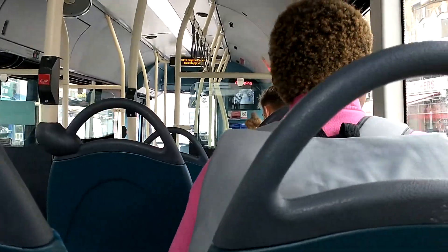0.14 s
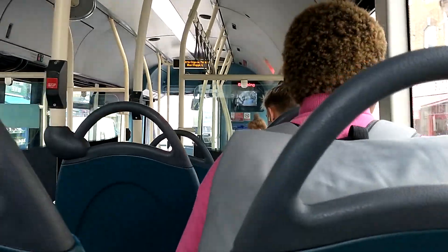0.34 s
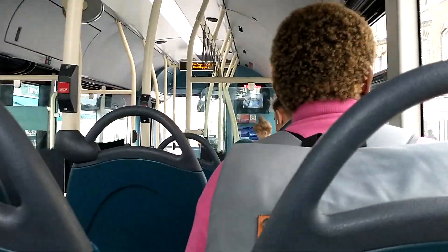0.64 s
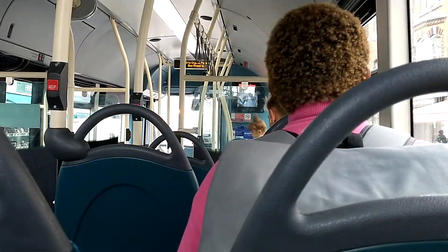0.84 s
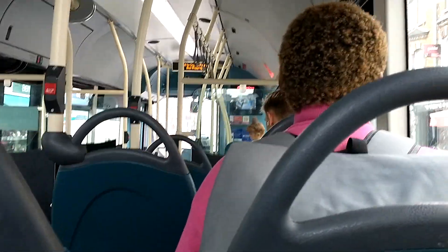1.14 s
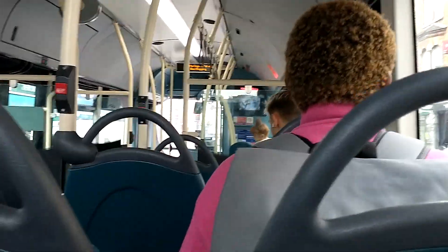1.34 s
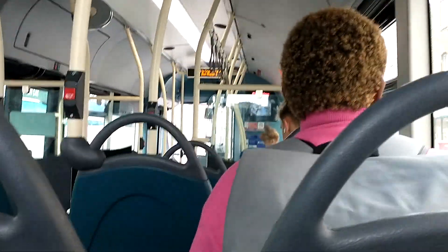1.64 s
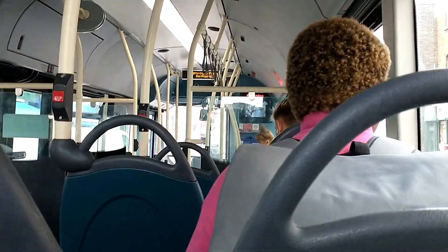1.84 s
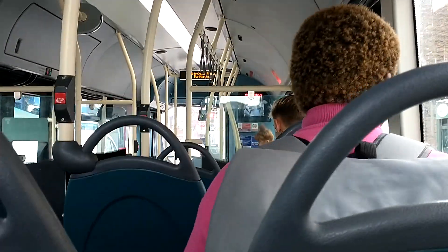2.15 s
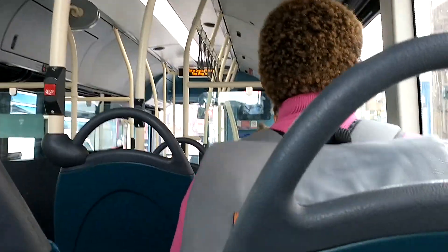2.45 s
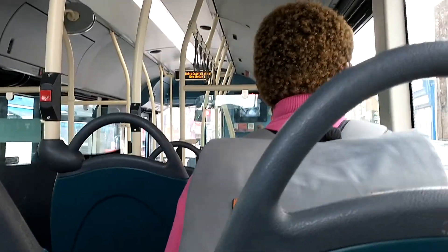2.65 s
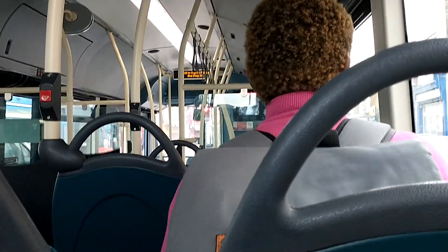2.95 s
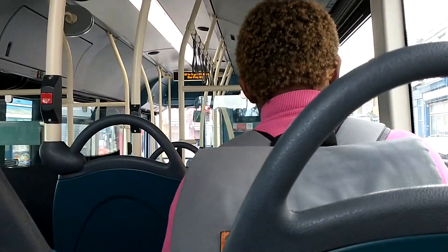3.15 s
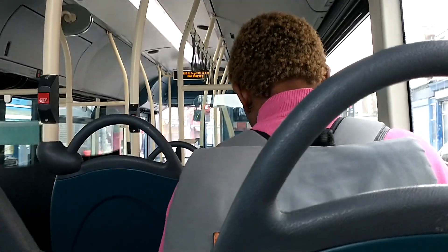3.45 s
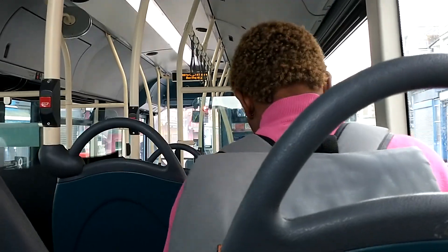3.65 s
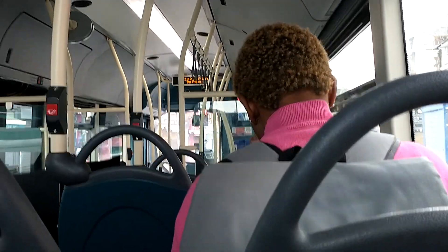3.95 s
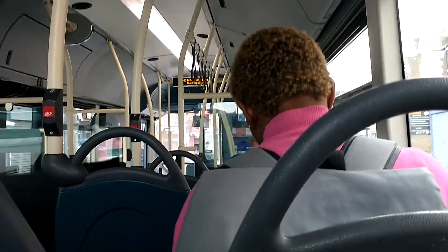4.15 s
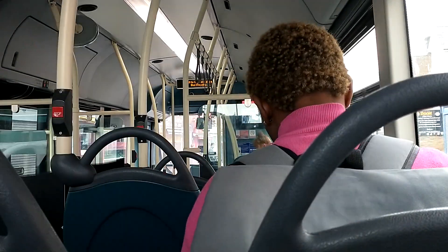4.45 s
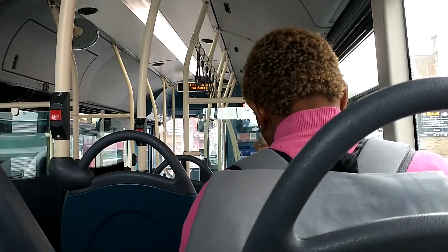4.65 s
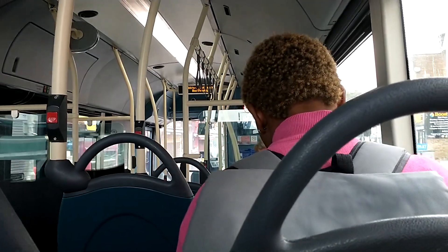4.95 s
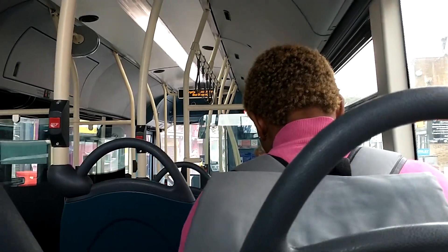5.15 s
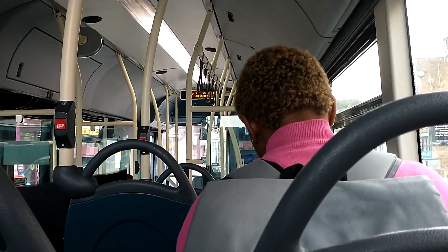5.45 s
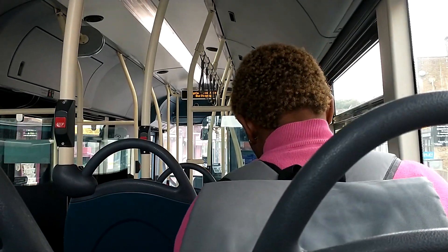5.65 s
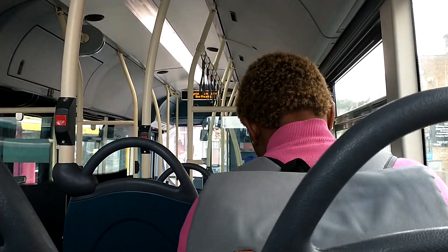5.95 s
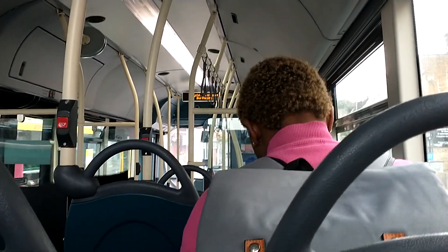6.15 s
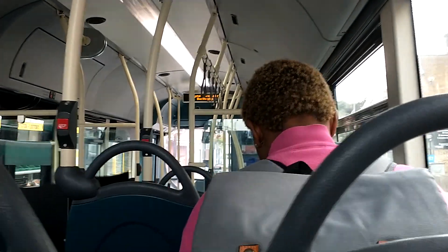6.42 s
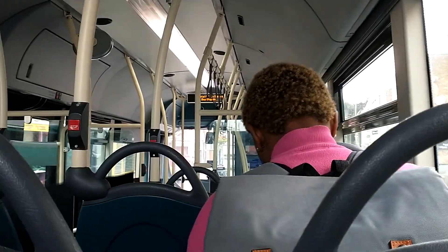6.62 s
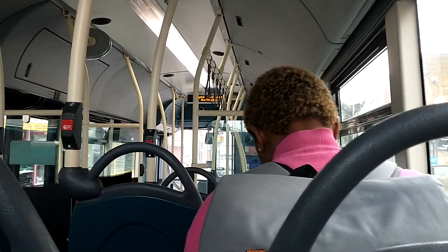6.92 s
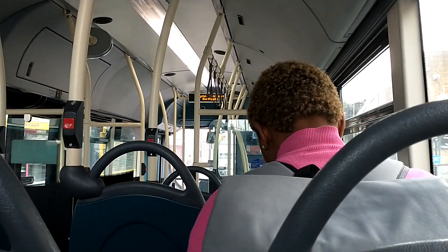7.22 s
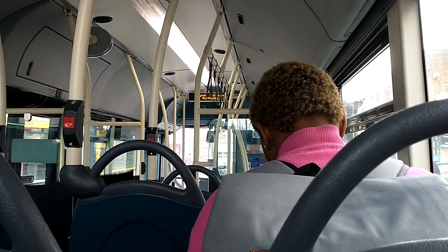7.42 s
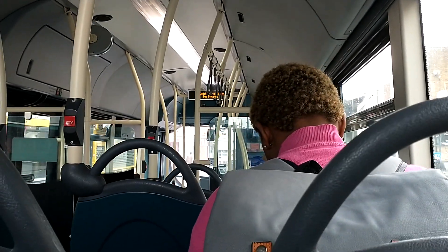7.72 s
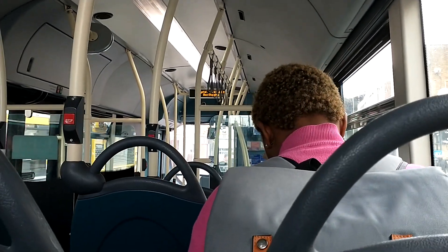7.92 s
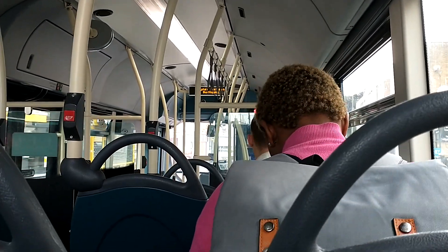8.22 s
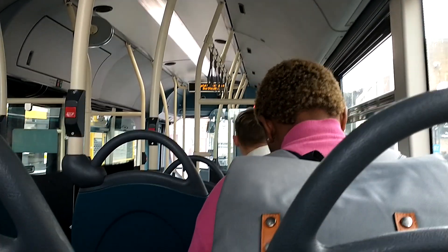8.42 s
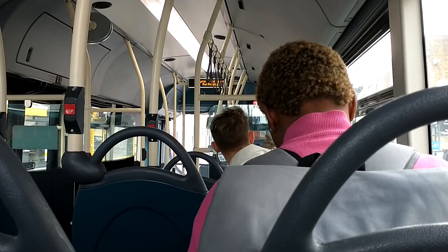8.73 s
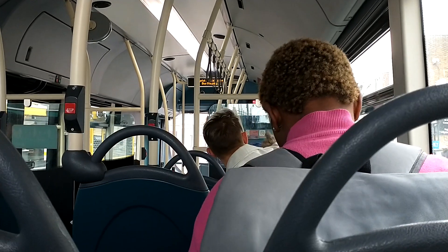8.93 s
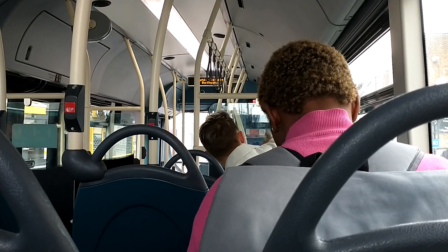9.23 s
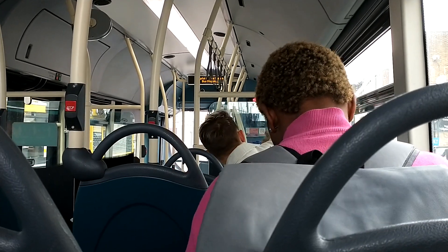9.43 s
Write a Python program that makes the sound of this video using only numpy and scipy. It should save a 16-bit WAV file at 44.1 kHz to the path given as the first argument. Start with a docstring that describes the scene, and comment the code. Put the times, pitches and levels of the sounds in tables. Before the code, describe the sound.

From a seat towards the rear of a bus, the engine growls, drops in pitch and settles into slow pulsing. Wheel bumps thud gently, panels boom and trim buzzes; a dense cluster of rattles and jolts comes midway. A thin high brake squeal and a tiny air spit follow, then steady idling, one brief rough hiss of brake air and a few last rattles. Treble leans left.

```python
"""Inside a diesel bus that slows down and stops: the engine, a sum of firing orders, falls to idle and throbs.
A low rumble of filtered noise swells over bumps, then holds on under the idle. As the engine pulls against
the brakes the body shudders in resonant bands, trim buzzes and taps at each firing, and struck fittings ring.
The brakes then squeal faintly as two wavering modes, and the valve spits. Once the bus stands, a short hiss
of turbulent noise lets the brake air out while the engine idles on."""
import sys
import numpy as np
from scipy import signal
from scipy.fft import rfft, irfft
from scipy.io import wavfile
from scipy.ndimage import uniform_filter1d

SR = 44100
rng = np.random.default_rng(int(sys.argv[2]) if len(sys.argv) > 2 else 0)


def bounce(signal):
    """Save signal as a 16-bit WAV file at the path given by the first command-line argument."""
    frames = np.transpose(np.atleast_2d(signal))
    limited = np.clip(frames, -1, 1)
    pcm = np.round(limited * 32767).astype(np.int16)
    wavfile.write(sys.argv[1], SR, pcm)


N = 422478
TIME = np.arange(N) / SR
BINS = np.fft.rfftfreq(N, 1 / SR)
# Every table named COLOUR is a relative noise spectrum: [f/Hz, spectral level/dB].


def amp(db):
    """Logarithmic level: converts decibels to amplitude gain."""
    return 10 ** (np.asarray(db) / 20)


def unit(x):
    """Power normalisation: scales a signal to rms 1."""
    return x / np.sqrt(np.mean(x ** 2) + 1e-20)


def curve(rows, column=1):
    """Linear interpolation: one column of a time table at every sample."""
    rows = np.asarray(rows)
    return np.interp(TIME, rows[:, 0], rows[:, column])


def read(points, hz):
    """Logarithmic frequency scale: interpolates a spectrum table along it."""
    f, value = np.transpose(points)
    return np.interp(np.log(hz + 1), np.log(f + 1), value)


def add(mix, s, sound):
    """Superposition: mixes a stereo sound in at time s."""
    part = mix[:, max(round(s * SR), 0):][:, :sound.shape[1]]
    part += sound[:, :part.shape[1]]


def drift(rate_hz):
    """Low-pass random process: slow motion of rms 1."""
    size = N // 32
    hz = np.fft.rfftfreq(size, 32 / SR)
    low_pass = np.exp(-(hz / rate_hz) ** 2) * (hz > 0)
    slow = unit(irfft(rfft(rng.standard_normal(size)) * low_pass, size))
    return np.interp(TIME, np.linspace(0, TIME[-1], size), slow)


def ringing(modes, size):
    """Modal resonance: the lift in dB that bell-shaped peaks give to each frequency."""
    hz = np.fft.rfftfreq(size, 1 / SR)
    return sum(db / (1 + (2 * (hz - f) / width) ** 2) for f, width, db in modes)


# Likeness of the two microphones: [f/Hz, correlation/1]
LIKENESS = [(90, .999), (125, .99), (250, .93), (500, .68), (900, .35), (1500, .22), (2500, 0)]


def in_cabin(drive, colour, extra_db=0):
    """Spatial coherence: colours two unrelated signals; long waves reach both microphones alike."""
    size = drive.shape[1]
    hz = np.fft.rfftfreq(size, 1 / SR)
    a, b = rfft(drive) * amp(read(colour, hz) + extra_db)
    same = np.clip(read(LIKENESS, hz), -1, 1)
    mid = a * np.sqrt(1 + same)
    side = b * np.sqrt(1 - same)
    return unit(irfft(np.array([mid + side, mid - side]), size))


def noise(colour, envelope=1, extra_db=0):
    """Filtered random excitation: coloured stereo noise under an envelope."""
    return in_cabin(rng.standard_normal((2, N)) * envelope, colour, extra_db)


def echoes(x, t60):
    """Reverberation: one source reaches each microphone by its own dense set of reflections."""
    t = np.arange(SR // 2) / SR
    tails = rng.standard_normal((2, len(t))) * amp(-60 * t / t60)
    return signal.fftconvolve(x[None], tails, axes=1)[:, :len(x)]


def swell(start, length, rise_db_per_s, fall_db_per_s):
    """Exponential growth and decay: an envelope that rises to 1 at the start, holds, then dies away."""
    before = np.maximum(start - TIME, 0)
    after = np.maximum(TIME - start - length, 0)
    return amp(-rise_db_per_s * before - fall_db_per_s * after)


def swells(rows, rise_db_per_s, fall_db_per_s, column=2):
    """Dominance of the strongest: the joint envelope of a table of events."""
    parts = [amp(row[column]) * swell(row[0], row[1], rise_db_per_s, fall_db_per_s) for row in rows]
    return np.max(parts, axis=0)


def gush(start, end, open_s, shut_s):
    """Valve flow: builds up ever more slowly and is then pinched off ever faster."""
    opening = np.exp(np.minimum((start - TIME) / open_s, 10))
    closing = (np.maximum(TIME - end, 0) / shut_s) ** 2
    return np.exp(-opening - closing)


def firing(turns, decay, base, uneven_db, lag):
    """Periodic excitation: a burst of uneven strength per cycle, dying within a share of it."""
    cycle = turns + lag % 1
    burst_db = uneven_db * np.clip(rng.standard_normal(1024), -2, 1.2)
    strength = amp(burst_db)[cycle.astype(int)]
    return base + strength * np.exp(-(cycle % 1) / decay)


# Effort of the engine: [t/s, level above idle/dB]
LOAD = [(0, 7), (.55, 7), (.8, 5), (1, 4), (1.7, 4.5), (2.2, 0), (3.5, -5), (4.2, 0.5), (6.2, -1.5),
        (6.7, .5), (8.2, 1), (9.58, 1)]


def effort(idle_db, follow):
    """Load dependence: the level of a layer that follows a share of the engine's load."""
    return amp(idle_db + follow * curve(LOAD))


ROLL_COLOUR = [(10, -16), (22, -7.5), (32, 5.5), (48, -17), (66, 12), (90, 9.5), (120, -3), (250, -60.5),
               (2000, -100)]
BOOM_COLOUR = [(35, -25.5), (65, -9), (95, -4.5), (120, 1.5), (145, -4), (175, -7), (210, -10.5),
               (260, -16.5), (500, -71.5), (3000, -100)]  # also weights the upper orders of the drone
ROAR_COLOUR = [(130, -14), (230, -1), (290, -0.5), (390, -2.5), (480, -4.5), (560, -4), (630, -6.5),
               (760, -11), (880, -14.5), (1300, -22), (3000, -54), (9000, -100)]
# Resonances of floor and panels: [f/Hz, width/Hz, lift/dB]
PANELS = [(131, 8.6, 2.5), (155, 8.6, 10), (176.5, 22, -2.5), (195.6, 22, 3), (242, 17, -3), (348, 16, 5),
          (443.4, 11, 7), (504, 15, 3), (544, 11, 1.5), (594, 24, -4), (640, 9.1, -2), (662, 49, 2),
          (732, 24, 5), (818, 21, 4), (1033, 42, 6), (1230, 30, 5)]
# Low rumble, of the running gear while the bus rolls, then held on under the idle: [t/s, level/dB]
ROAD = [(0, -38), (.75, -37), (1.2, -27.5), (2.5, -34.5), (4.1, -33), (4.7, -38.5)]
# Bumps under the wheels: [start t/s, length/s, level/dB]
BUMPS = [(.92, 0.038, -32.5), (1.6, 0.12, -26.5), (2.2, 0.019, -23.5), (2.74, 0.12, -28),
         (3.18, 0.063, -34), (3.76, 0.076, -26.5), (4.03, 0.44, -33), (4.57, 0.066, -24.5)]


def body(turns, shake, roll_db=0, boom_db=-38.5, boom_follow=0.82, shaken_boom_db=-2,
         roar_db=-41.5, roar_follow=0.21, shaken_roar_db=-9.0):
    """Forced vibration: a low rumble swells over bumps; firings and shudders make floor and panels boom and roar."""
    panels = ringing(PANELS, N)
    bumps = swells(BUMPS, rise_db_per_s=199.0, fall_db_per_s=85.5)
    # unrelated causes add in power
    roll = amp(roll_db) * np.hypot(amp(curve(ROAD)), bumps)
    boom = np.hypot(effort(boom_db, boom_follow), amp(shaken_boom_db) * shake)
    roar = np.hypot(effort(roar_db, roar_follow), amp(shaken_roar_db) * shake)
    boom_pulses = firing(turns, 0.94, 3.6, 6.1, 0.048)
    roar_pulses = firing(2 * turns, 0.65, 2.4, 1.3, .1)
    return (roll * noise(ROLL_COLOUR)
            + boom * noise(BOOM_COLOUR, boom_pulses, panels)
            + roar * noise(ROAR_COLOUR, roar_pulses, panels))


TRIM_COLOUR = [(3000, -36), (5500, -11.5), (7000, -3.5), (8300, -2), (9600, -8), (10500, -9), (13000, -19),
               (16000, -17)]
KNOCK_COLOUR = [(200, -29), (600, -16), (1500, 6.5), (2700, 3), (3400, -14.5), (4700, -14.5), (6500, -19.5),
                (10000, -39.5), (16000, -43.5)]  # also colours the single knocks
# Resonances of the metal trim, the loose fittings and smaller parts: [f/Hz, width/Hz, lift/dB]
TRIM_MODES = [(6500, 200, 5), (8200, 260, 1.5), (8750, 160, 2), (9400, 320, 5)]
FITTING = [(1540, 39, 3.5), (2500, 120, 6), (2717, 90, 4), (4170, 250, -5.5), (4490, 110, 6), (4650, 90, 3),
           (4880, 130, 7)]
SMALL_PARTS = [(5270, 130, 9), (5790, 130, 7), (6030, 150, -3.5), (6530, 190, 11.5), (6950, 130, 5),
               (7450, 120, 7), (8200, 250, 6)]
# Spells in which a loose metal trim buzzes: [start t/s, length/s, level/dB]
BUZZES = [(1.08, 0.42, -74.5), (1.8, .12, -75), (2.78, .16, -71.5), (3.28, .06, -78), (3.78, .05, -75),
          (4.22, 0.18, -70), (4.5, 0.57, -69), (5.1, 0.83, -69.5), (6.3, 0.79, -71.5), (7.0, 0.42, -72.5),
          (9.05, 0.32, -64)]
# Shudders of the body: [start t/s, length/s, shaking before each layer's gain/dB, rattle level/dB]
SHUDDERS = [(1.53, 0.037, -32, -72), (2.8, 0.089, -30, -53), (4.01, 0.072, -26, -68),
            (4.35, 0.043, -28, -64), (4.56, 0.16, -23, -55), (4.86, 0.15, -23.5, -44.5),
            (5.18, 0.17, -20.5, -45), (5.42, 0.16, -19.5, -43.5), (5.71, 0.064, -24.5, -46.5),
            (8.32, 0.24, -29, -51), (8.585, 0.026, -24, -40), (9.54, 0.046, -27.5, -51)]


def buzzes(turns, trim_db=0, trim_rest_db=-86, rattle_db=0, rattle_rest_db=-66, detune=0.011):
    """Repeated contact: firings shake trim and fittings; shudders rattle two detuned sets in shifting shares."""
    trim = echoes(rng.standard_normal(N) * firing(turns, 0.22, .2, 2, 0.5), 0.21)
    rattle = echoes(rng.standard_normal(N) * firing(turns, 0.39, 0.8, 2.6, 0.22), 0.23)
    trim_swells = swells(BUZZES, rise_db_per_s=103, fall_db_per_s=72.0)
    rattle_swells = swells(SHUDDERS, rise_db_per_s=162, fall_db_per_s=48, column=3)
    buzzing = np.hypot(amp(trim_rest_db), amp(trim_db) * trim_swells)
    rattling = np.hypot(amp(rattle_rest_db), amp(rattle_db) * rattle_swells)
    parts = np.array(FITTING + SMALL_PARTS)
    low = in_cabin(rattle, KNOCK_COLOUR, ringing(parts, N))
    high = in_cabin(rattle, KNOCK_COLOUR, ringing(parts * [1 + detune, 1, 1], N))
    share = np.clip(.35 + .6 * drift(8), 0, 1)
    fittings = (1 - share) * low + share * high
    return buzzing * in_cabin(trim, TRIM_COLOUR, ringing(TRIM_MODES, N)) + rattling * fittings


TAP_COLOUR = [(3000, -28), (6000, -7), (7800, -4.5), (9000, -1), (10200, -13), (11200, -14), (15000, -24)]
# Spells in which a strip of trim taps: [start t/s, length/s, level/dB, ring f/Hz, ring lift/dB]
TAPPING = [(4.12, .74, -72.5, 9600, 17), (4.85, .75, -71, 6420, 25), (6.149, 0.8, -75.5, 9470, 3),
           (6.898, .6, -82, 9470, 3), (8.9, 0.8, -72.5, 9400, 9)]


def taps(turns, level_db=0, ring_width_hz=320):
    """Periodic impact: a strip of trim taps once per firing, a crisp, even ticking."""
    out = np.zeros((2, N))
    beat = firing(turns, .1, .08, 1, .55)
    for start, length, db, ring_hz, ring_db in TAPPING:
        part = beat[round(start * SR):][:round(length * SR)]
        size = len(part)
        drive = rng.standard_normal((2, size)) * part * signal.windows.tukey(size, .5)
        ring = ringing([(ring_hz, ring_width_hz, ring_db)], size)
        add(out, start, amp(db + level_db) * in_cabin(drive, TAP_COLOUR, ring))
    return out


def blow(colour, rise, t60, grain_db, extra_db=0):
    """Damped impact: up to half a second of chattering contact that dies away in the cabin."""
    t = np.arange(SR // 2) / SR
    grain = unit(uniform_filter1d(rng.standard_normal(len(t)), size=130))
    drive = rng.standard_normal((2, len(t))) * amp(grain_db * grain) * amp(-60 * t / t60)
    attack = 1 - np.exp(-(t / rise) ** 2)
    fade_out = np.clip(2 - 5 * t, 0, 1)
    return in_cabin(drive, colour, extra_db) * attack * fade_out


TICK_COLOUR = [(1500, -26), (4000, 2), (7000, 8), (9500, 0), (11000, -10), (14500, -8), (16000, -19)]
JOLT_COLOUR = [(60, -6.5), (160, -14), (330, 0), (500, 5.5), (900, -9.5), (1600, -13.5), (3000, -20),
               (9000, -75.5)]
SPIT_COLOUR = [(300, -6), (750, 13), (1200, 4), (1900, 13), (2700, 4), (3700, 6), (5500, -5), (8500, -10),
               (11000, -20), (15500, -22)]
# Levels in these four tables are relative; the function adds a gain common to each kind.
# Knocks of the fittings: [t/s, level/dB, treble index/dB, pitch of the struck part f/Hz, ring lift/dB]
KNOCKS = [(1.3246, -36.5, -30, 1850, 4), (2.131, -34.5, -27, 2650, 18), (2.647, -36.5, -31, 2670, 17),
          (2.757, -40, -11, 2520, 4), (2.802, -36, -16, 1540, 2), (2.824, -33, -17, 2650, 4),
          (2.909, -32, -22, 2690, 3), (2.939, -40.5, -23, 1530, 7), (3.0763, -34.5, -21, 2650, 11),
          (3.112, -39.5, -26, 2650, 10), (3.322, -51, -18, 2600, 5), (3.4841, -36.5, -30, 2640, 13),
          (3.7465, -34, -18, 2580, 8), (3.795, -40.5, -20, 2570, 10), (3.9333, -33, -19, 2400, 2),
          (4.0872, -38, -10, 2430, 6), (4.356, -43, -26, 2500, 2), (4.4, -42, -26, 2550, 6),
          (4.484, -31.5, -15, 2550, 5), (4.53, -31, -13, 2500, 4), (4.575, -35, -18, 2530, 5),
          (4.628, -37, -28, 2550, 6), (4.67, -32, -18, 2560, 8), (4.806, -35, -18, 2480, 4),
          (4.834, -30, -34, 2560, 11), (4.945, -29, -33, 2600, 10), (5.017, -35, -29, 2550, 8),
          (5.1, -37, -28, 2540, 8), (5.146, -30, -31, 2500, 12), (5.196, -32.5, -36, 2530, 10),
          (5.26, -32, -38, 2520, 6), (5.401, -39, -34, 2650, 5), (5.445, -34, -34, 2700, 13),
          (5.488, -28, -23, 2550, 9), (5.5288, -32, -7, 2650, 6), (5.583, -36, -17, 2650, 5),
          (5.72, -38, -28, 2600, 2), (6.246, -41, -6, 2510, 5), (6.813, -38.5, -14, 2530, 3),
          (8.2434, -37.5, -11, 2570, 6), (9.267, -38, -6, 2700, 8)]
# Sharp metal ticks: [t/s, level/dB]
TICKS = [(1.3231, -60), (2.1301, -60), (2.8165, -57), (2.9044, -56), (3.5422, -62), (3.7449, -60),
         (3.933, -64), (4.8339, -54), (4.939, -51), (5.1438, -50.5), (5.4822, -50), (5.529, -53),
         (6.246, -64)]
# Jolts of the body: [t/s, level/dB, decay by 60 dB t60/s]
JOLTS = [(1.326, -29, 0.1), (2.001, -34, .06), (3.959, -30, .1), (4.009, -27.5, .16), (4.095, -32, 0.072),
         (4.354, -30.5, 0.1), (4.537, -29, 0.1), (4.625, -27.5, 0.12), (4.68, -31.5, .1),
         (4.783, -34, 0.073), (4.856, -30.5, 0.073), (4.903, -25, 0.041), (4.942, -24.5, 0.079),
         (5.172, -25, 0.14), (5.268, -24, 0.2), (5.4, -20, 0.088), (5.446, -21, 0.13), (5.486, -26.5, 0.07),
         (5.558, -30.5, .1), (5.724, -31, 0.069)]
# Short spits: a faint one under the knock at 6.246 s, then one of the brake valve: [t/s, level/dB]
SPITS = [(6.247, -59), (6.301, -45.5)]


def rattles(level_db=-22, jolt_db=-18, tick_db=-19, spit_db=-4, treble_share=0.54,
            usual_treble_db=-22, ring_width_hz=95, overtone=1.793, overtone_db=3):
    """Impact excitation of modes: fittings knock and tick, some brighter; jolts thud; the valve spits."""
    out, size = np.zeros((2, N)), SR // 2
    octaves_above_3k = np.log2((np.fft.rfftfreq(size, 1 / SR) + 1) / 3000)
    treble = np.clip(octaves_above_3k, 0, 1)
    for s, db, treble_db, hz, ring_db in KNOCKS:
        struck = [(hz, ring_width_hz, ring_db), (hz * overtone, ring_width_hz, ring_db + overtone_db)]
        tilt_db = treble_share * (treble_db - usual_treble_db) * treble
        colour_db = ringing(FITTING + struck, size) + tilt_db
        add(out, s, amp(db + level_db) * blow(KNOCK_COLOUR, 0.00058, 0.32, 0.45, colour_db))
    for s, db in TICKS:
        add(out, s, amp(db + tick_db) * blow(TICK_COLOUR, .0003, 0.096, 2))
    panels = ringing(PANELS, size)
    for s, db, t60 in JOLTS:
        add(out, s, amp(db + jolt_db) * blow(JOLT_COLOUR, 0.0016, t60, 0.6, panels))
    parts = 0.41 * ringing(FITTING + SMALL_PARTS, size)
    for s, db in SPITS:
        add(out, s, amp(db + spit_db) * blow(SPIT_COLOUR, 0.0075, 0.21, 0.94, parts))
    return out


# Brake squeals: [start t/s, length/s, mean f/Hz, level before the common gain/dB]
SQUEALS = [(5.93, 0.073, 6890, -79), (6.06, .05, 6885, -75), (6.16, .04, 6880, -73), (6.32, .12, 6860, -71),
           (6.5, .08, 6800, -83), (6.058, 0.04, 4400, -72), (6.13, 0.06, 4470, -66.5),
           (6.303, 0.037, 4436, -67), (6.43, 0.18, 4450, -72), (6.86, 0.52, 4436, -72),
           (6.97, .1, 4440, -64)]


def brakes(level_db=6.5, waver_hz=19):
    """Friction-driven vibration: two thin modes of the brake discs, wavering as the pads rub."""
    out = np.zeros((2, N))
    for start, length, hz, db in SQUEALS:
        pitch = hz + waver_hz * drift(90)
        tone = np.sin(2 * np.pi * np.cumsum(pitch) / SR)
        tone *= amp(db + level_db) * swell(start, length, rise_db_per_s=110, fall_db_per_s=170)
        out += tone * (1 + .25 * np.array([drift(35), drift(35)]))
    return out


AIR_COLOUR = [(1000, -29), (1700, -1), (1850, -8), (2290, 5.5), (2670, -15), (3040, -5), (3280, -10),
              (3630, -0.5), (4830, -4.5), (5600, -11), (6740, -10), (12300, -17), (14500, -20),
              (15500, -32)]
RASP_COLOUR = [(2000, -25), (3300, 14), (4500, 2), (6500, -3), (9000, -9), (15000, -21)]
OUTLET_COLOUR = [(1200, -35), (1750, -4), (2100, 0), (2300, -1), (2800, 5), (3750, -6), (4300, -18),
                 (6000, -27)]
# Resonances of the valve's outlet: [f/Hz, width/Hz, lift/dB]
OUTLET = [(2286, 65, 12), (2520, 30, 7), (2700, 38, 5.5), (2910, 30, 7.3), (3050, 28, 12), (3320, 40, 7),
          (3400, 60, 7), (3700, 54, 8), (3900, 60, 8)]
# The outlet sounds a little before the valve's jet and rings on after it
VALVE_OPEN_S, VALVE_SHUT_S, OUTLET_LEAD_S, OUTLET_LAG_S = 8.562, 8.907, 0.018, 0.11


def air(jet_db=-37.5, outlet_db=-38.0, rasp_db=-42, rasp_delay_s=0.16):
    """Jet turbulence: brake air echoes through the bus, raspier when wide open; the outlet resonates."""
    flow = gush(VALVE_OPEN_S, VALVE_SHUT_S, open_s=0.071, shut_s=0.108)
    wide_open = gush(VALVE_OPEN_S + rasp_delay_s, VALVE_SHUT_S, open_s=0.074, shut_s=0.09)
    ring = gush(VALVE_OPEN_S - OUTLET_LEAD_S, VALVE_SHUT_S + OUTLET_LAG_S, open_s=0.025, shut_s=0.14)
    turbulence = unit(echoes(rng.standard_normal(N), 0.18)) + rng.standard_normal((2, N))
    jet = flow * amp(jet_db) * in_cabin(turbulence, AIR_COLOUR)
    rasp = wide_open * amp(rasp_db) * in_cabin(turbulence, RASP_COLOUR)
    outlet = ring * amp(outlet_db) * noise(OUTLET_COLOUR, extra_db=ringing(OUTLET, N))
    return (jet + rasp + outlet) * amp(.5 * drift(30))


CLATTER_COLOUR = [(400, -11.5), (800, 6), (1100, 7), (1550, 5), (2000, 5), (2600, 1.5), (2900, 0),
                  (3300, -7.5), (4400, -12.5), (5600, -21), (7500, -27.5), (10500, -33), (15500, -51)]
SIZZLE_COLOUR = [(6000, -6), (10000, -5), (11900, -2), (12450, 3.5), (13000, -0.5), (15500, -13.5)]


def clatter(turns, shake, level_db=-47.5, follow=0.29, shaken_db=-24, sizzle_db=-79):
    """Pulsed structure-borne noise: diesel clatter through the bulkhead, a faint high sizzle per firing."""
    level = np.hypot(effort(level_db, follow), amp(shaken_db) * shake)
    knock = level * noise(CLATTER_COLOUR, firing(2 * turns, .6, 2.2, 3, 0.17))
    return knock + amp(sizzle_db) * noise(SIZZLE_COLOUR, firing(turns, .3, .8, 2.5, .1))


# Answer of the cabin to the upper orders: [f/Hz, level/dB]
GROWL_COLOUR = [(150, -16), (228, -3), (260, -5), (295, 4), (320, -5), (360, -5), (385, 0), (420, -4),
                (480, -9), (520, -5), (575, -2), (600, -9), (632, -1.5), (660, -8), (685, -1), (705, -7),
                (730, -2), (770, -11), (810, -2.5), (860, -14), (1500, -30)]
INTAKE_COLOUR = [(900, -18), (1400, 12), (2200, -12.5), (4100, -5.5), (5200, -9), (7000, -18), (8500, -31),
                 (16000, -37)]
# Engine speed, falling to idle: [t/s, firing rate f/Hz]
SPEED = [(0, 44.6), (.35, 45.7), (.5, 45.6), (.62, 43.2), (.78, 40.9), (.98, 33.6), (1.15, 29.4),
         (1.5, 29.8), (2.1, 28.2), (2.4, 28), (3.3, 26.3), (3.9, 24.3), (4.3, 22.6), (5.5, 21.7),
         (6.2, 22.8), (6.8, 22.4), (8.45, 22.3), (8.9, 23.2), (9.2, 22.8)]


def growl(turns, level_db=-46.5, follow=0.96, half_order_db=-4, intake_db=-61, intake_follow=0.82):
    """Harmonic series in a resonant cabin: unequal cylinders add half orders; the intake hisses with load."""
    rate, out = curve(SPEED)[::64], np.zeros((2, N))
    for k in np.r_[4:37, 4.5:14]:  # whole orders, then half orders
        db = read(GROWL_COLOUR, k * rate) + half_order_db * (k % 1 > 0)
        strength = np.interp(TIME, TIME[::64], amp(db)) * (1 + .3 * drift(2.5))
        # the two channels differ more in phase at higher orders
        start = rng.uniform(0, 2 * np.pi) + k / 30 * rng.standard_normal((2, 1))
        out += strength * np.cos((2 * np.pi * (k * turns % 1) + start).astype(np.float32))
    return effort(level_db, follow) * unit(out) + effort(intake_db, intake_follow) * noise(INTAKE_COLOUR)


# Relative strength of engine orders 1 to 4: [level/dB]
ORDER_DB = [0.5, -0.5, -12, -7.5]
# Answer of the cabin's air to these orders: [f/Hz, level/dB]
CABIN = [(22, -30.5), (30, -37.5), (39, -28.5), (45, -43.5), (60, -41), (70, -24), (78, -35), (89, -22.5),
         (101, -37), (135, -25.5), (160, -39.5), (184, -29)]


def drone(turns, shake, level_db=-1, follow=0.47, overtone_db=-41, overtone_follow=0.25, shaken_db=-9,
          waver=0.18, overtone_waver=0.63, spread=0.398):
    """Fourier synthesis: firing orders nearly in step make idle throb; each swells at a cabin resonance."""
    rate = curve(SPEED)
    angle = 2 * np.pi * turns
    out, push = np.zeros((2, N)), effort(level_db, follow)
    for k, db in enumerate(ORDER_DB, 1):
        strength = push * amp(db + read(CABIN, k * rate)) * (1 + waver * drift(17))
        out += strength * np.cos(k * angle)
    boom = np.hypot(effort(overtone_db, overtone_follow), amp(shaken_db) * shake)
    for k in range(5, 11):  # higher orders sound as far as the body booms with them
        strength = boom * amp(read(BOOM_COLOUR, k * rate)) * (1 + overtone_waver * drift(12.2))
        out += strength * np.cos(k * angle + spread * (k - 4) ** 2)
    return np.sqrt(2) * out


def scene():
    """Superposition of all sources, coupled by the engine's turning and the shaking of the body."""
    turns = np.cumsum(curve(SPEED)) / SR  # counted in firings
    shake = swells(SHUDDERS, rise_db_per_s=125, fall_db_per_s=57)
    cabin = body(turns, shake) + buzzes(turns) + taps(turns) + rattles()
    engine = clatter(turns, shake) + growl(turns) + drone(turns, shake)
    return cabin + brakes() + air() + engine


# Balance of the microphones: [f/Hz, left minus right level/dB]
LEAN = [(60, -0.5), (110, -0.5), (200, -3), (380, 0.5), (700, 1.0), (1290, 6.5), (2380, 5), (4400, 9),
        (8120, 10.5), (15000, 13.5)]
LEFT_DELAY_S, EDGE_HZ = .00027, 15680


def record(dry):
    """Delay and shading between microphones: left hears later, right is shaded in the treble; then a low-pass."""
    lean = amp(np.outer([.5, -.5], read(LEAN, BINS)))
    lean = lean / np.sqrt(np.mean(lean ** 2, axis=0))
    delay = np.exp(-2j * np.pi * np.outer([LEFT_DELAY_S, 0], BINS))
    heard = irfft(rfft(dry) * delay * lean, N)
    low_pass = signal.firwin(1023, EDGE_HZ, window=("kaiser", 9), fs=SR)
    return signal.oaconvolve(heard, low_pass[None], "same")


dry = scene()
out = record(dry)
bounce(out)
```